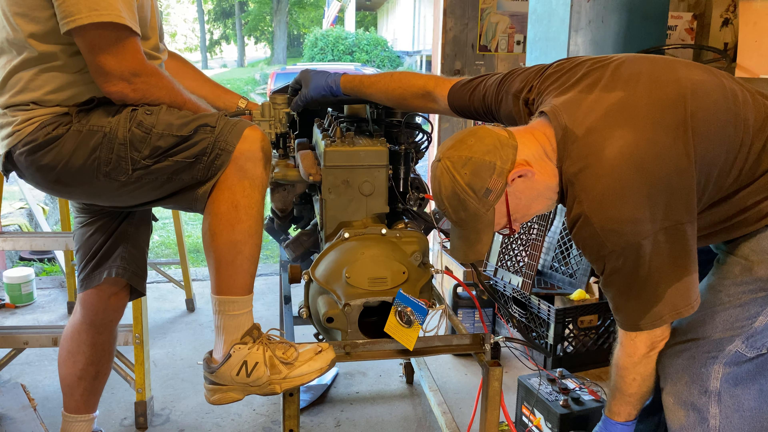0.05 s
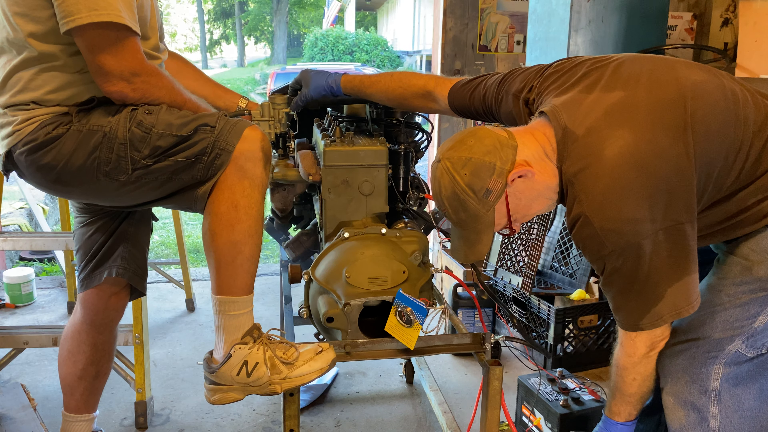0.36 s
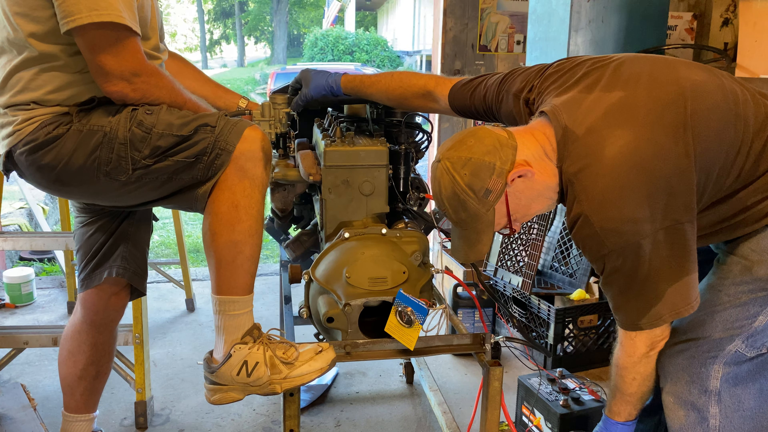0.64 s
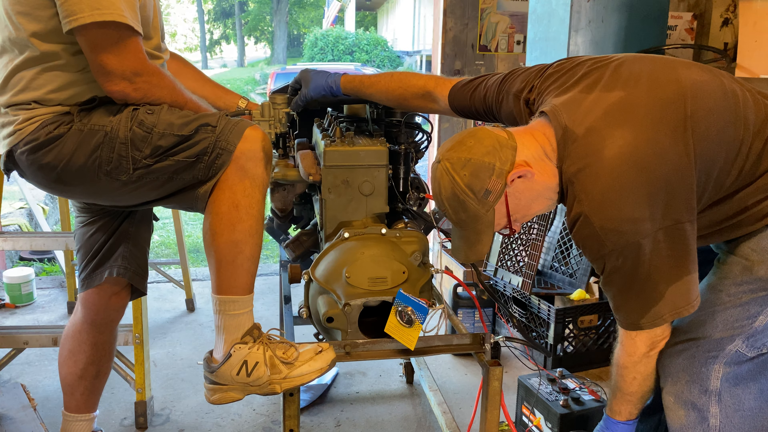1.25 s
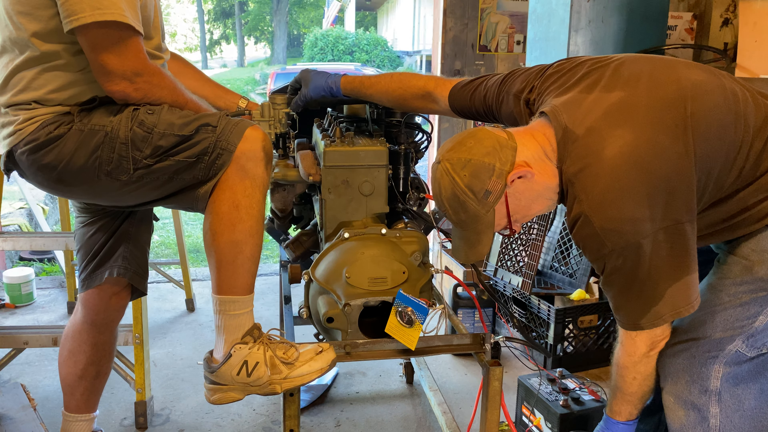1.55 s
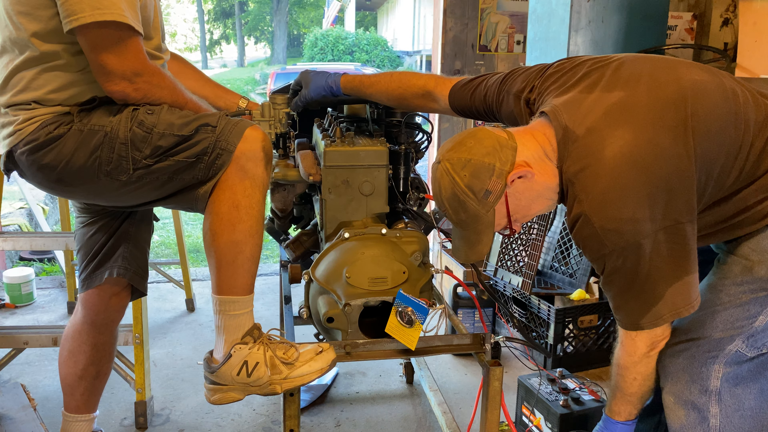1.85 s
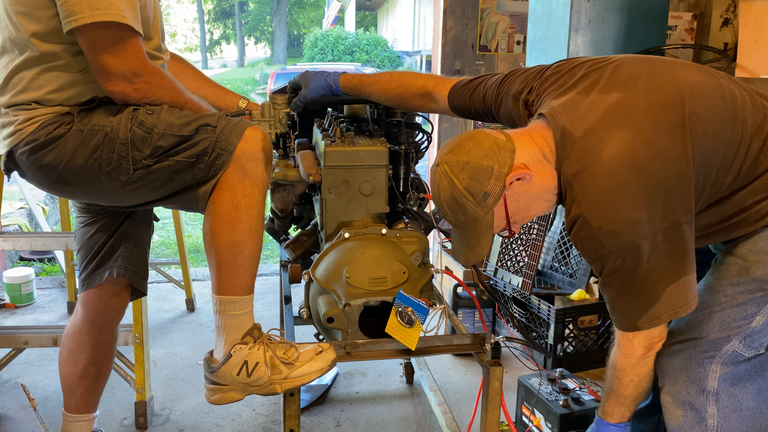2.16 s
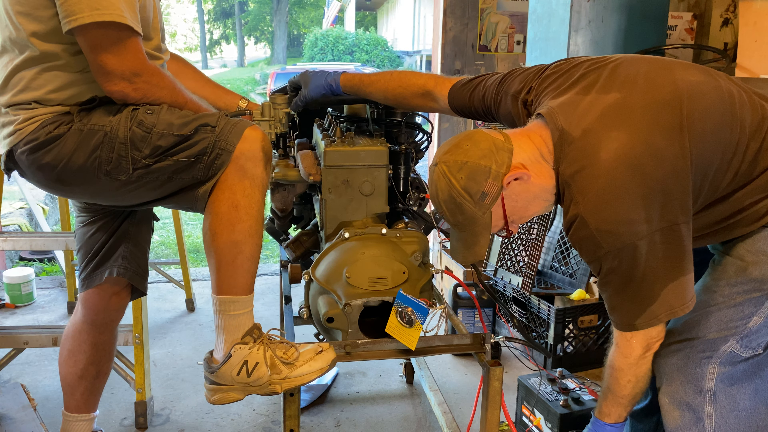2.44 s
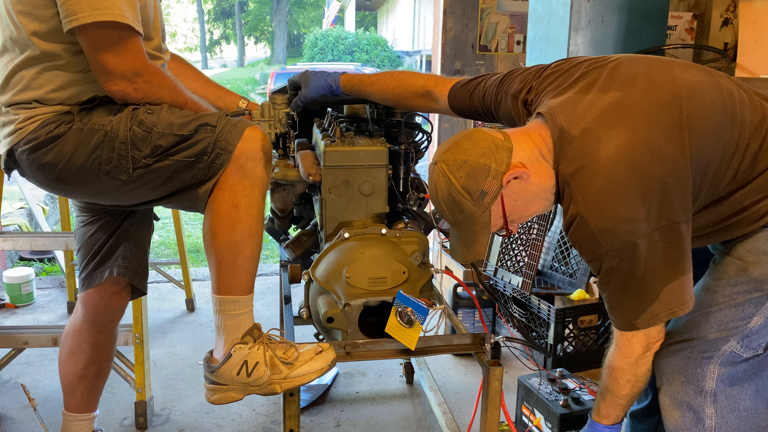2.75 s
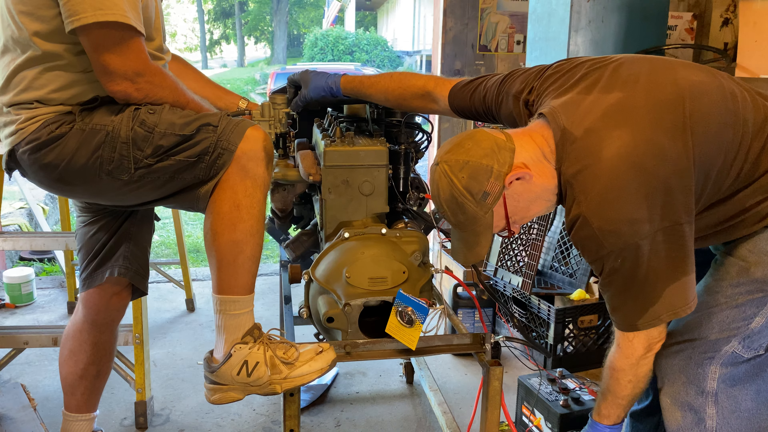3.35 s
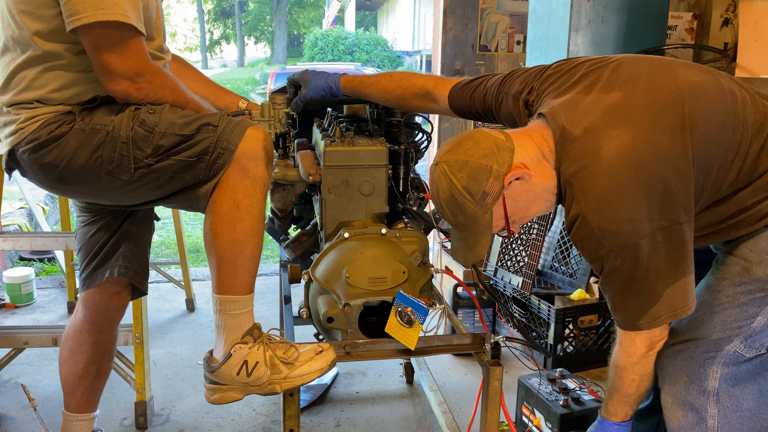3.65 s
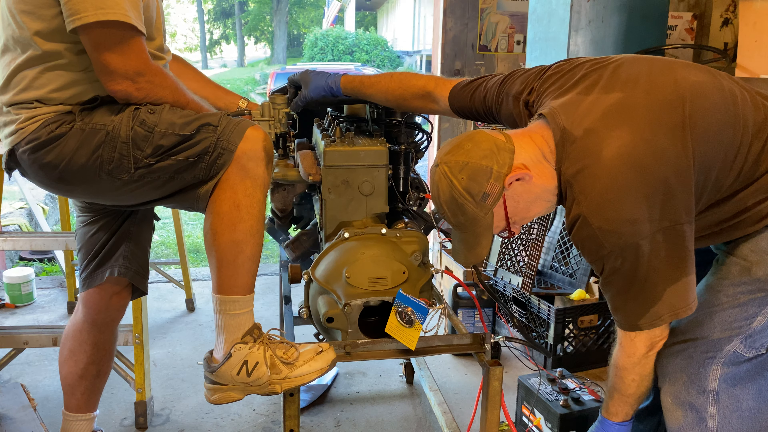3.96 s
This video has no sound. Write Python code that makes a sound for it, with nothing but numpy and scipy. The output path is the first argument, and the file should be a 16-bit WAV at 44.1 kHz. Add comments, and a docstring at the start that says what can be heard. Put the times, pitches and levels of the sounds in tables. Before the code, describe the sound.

An old engine fires in rapid, rattling pulses with low exhaust thumps, then dies. After a short pause the starter clashes in, grinding and squealing, and the engine catches unevenly, heard close in a workshop.

```python
"""Over faint air and hum, an old engine on a workshop stand fires in short runs with misses between.
Each firing: a rattling gas blast that rings the manifold, then a low exhaust thump; the room rings briefly.
It dies after 1.4 s; a faint metal click follows. At 2.4 s the starter clashes in, grinds and squeals.
From 2.6 s the engine catches again and stumbles on over the grinding."""
import sys
import numpy as np
from scipy import signal
from scipy.fft import rfft, irfft
from scipy.io import wavfile

SR = 44100
rng = np.random.default_rng(int(sys.argv[2]) if len(sys.argv) > 2 else 0)


def wrap_up_sound(samples):
    """Save the sound to the file named by the first command line argument, as 16-bit audio."""
    columns = np.atleast_2d(samples).T
    # keep every value between -1 and 1, then stretch to whole-number steps
    tamed = np.clip(columns, -1, 1)
    steps = np.round(tamed * 32767).astype(np.int16)
    wavfile.write(sys.argv[1], SR, steps)


N = 176400

# air noise: freq_hz, gain_db
AIR_SPECTRUM = [(18, -34.5), (30, -11), (113, -4), (132, -23.5), (167, -12), (448, -19.5), (597, -8.5),
                (662, -14.5), (1060, -11), (15000, -50)]
# hum partials: pitch_hz, level_db
HUM_PARTIALS = [(54, -65), (107, -64), (162, -65.5), (268, -75)]

# engine firings, levels before trim: start_s, body_db, rush_db, hiss_db, thump_delay_s, thump_db,
# bark_hz, bark_db, clank_hz, clank_db
ENGINE_FIRINGS = [(-0.004, -23, -24, -42, 0.019, -23, 1819, -51.5, 4280, -49),
                  (0.1046, -23, -21, -30, 0.029, -21.5, 2088, -29.5, 4209, -34.5),
                  (0.167, -23.5, -22.5, -28.5, 0.024, -21, 1464, -49.5, 4950, -27),
                  (0.233, -23, -21, -25.5, 0.0238, -20, 2013, -32.5, 3384, -31),
                  (0.306, -26.5, -20, -26.5, 0.024, -23.5, 1722, -39, 5030, -35.5),
                  (0.3652, -21, -18, -27.5, 0.0235, -20.5, 1378, -38, 4510, -37),
                  (0.419, -20, -16.5, -28, 0.0241, -20.5, 2077, -44, 3480, -32),
                  (0.475, -23.5, -19.5, -24, 0.0231, -20, 1711, -26, 4170, -40),
                  (0.625, -26, -20, -29.5, 0.028, -22.5, 1937, -29.5, 3990, -26),
                  (0.692, -22, -19.5, -30.5, 0.026, -20.5, 1528, -37, 4340, -32.5),
                  (0.7625, -20.5, -20, -27, 0.0234, -21, 1528, -44, 3400, -34),
                  (0.8322, -29, -21.5, -25, 0.026, -22, 1496, -32, 4930, -25),
                  (0.889, -21, -19, -26.5, 0.0243, -20, 2013, -38.5, 3460, -35),
                  (0.9429, -22, -20, -27, 0.0226, -18, 1668, -33, 3170, -25.5),
                  (0.9928, -20, -20.5, -26.5, 0.0232, -18.5, 1711, -50, 4200, -35.5),
                  (1.1213, -24, -21.5, -26, 0.0243, -22.5, 2013, -31.5, 4180, -36),
                  (1.1804, -19.5, -20.5, -33.5, 0.0239, -18, 1679, -43, 4300, -34),
                  (1.2411, -21.5, -16.5, -28.5, 0.023, -19.5, 2056, -25.5, 4140, -33),
                  (1.304, -23.5, -24, -26.5, 0.0248, -19, 2056, -54, 4010, -41),
                  (1.361, -19.5, -19, -27.5, 0.025, -20.5, 1388, -50.5, 5140, -23.5),
                  (1.414, -22, -21.5, -28.5, 0.026, -19.5, 1668, -39.5, 5700, -31.5),
                  (2.583, -29, -36.5, -35, 0.032, -24.5, 1658, -31.5, 4909, -35),
                  (2.6802, -19.5, -19, -32, 0.024, -20, 1442, -45, 4200, -29.5),
                  (2.9785, -20, -18.5, -30, 0.0265, -24.5, 1647, -41.5, 4350, -28),
                  (3.055, -26.5, -20.5, -28, 0.0228, -18.5, 1528, -26, 5780, -28),
                  (3.129, -16, -18, -26, 0.0244, -18, 2228, -30.5, 3430, -24.5),
                  (3.195, -21.5, -21, -26.5, 0.0235, -18, 1356, -36, 2890, -30),
                  (3.2528, -16, -18, -32, 0.0253, -17.5, 1442, -32, 4250, -59),
                  (3.307, -17.5, -16.5, -30.5, 0.0242, -16.5, 1518, -37.5, 4600, -27.5),
                  (3.529, -19, -17, -26.5, 0.0235, -22, 1442, -34, 4220, -29),
                  (3.605, -20.5, -17.5, -27.5, 0.027, -17.5, 1647, -39, 5680, -35),
                  (3.809, -32.5, -23, -29, 0.0312, -24, 1399, -40.5, 4980, -32),
                  (3.974, -39.5, -26, -32, 0.027, -25, 1453, -32, 4600, -30)]
BODY_TRIM_DB, RUSH_TRIM_DB, HISS_TRIM_DB = -2, -1, 3.5
THUMP_TRIM_DB, BARK_TRIM_DB, CLANK_TRIM_DB = 3.5, 5, 4.5
LEAD_S, ATTACK_S, HOLD_S = 0.0064, 0.012, 0.0035  # blast opens LEAD_S before start_s
BODY_DECAY_S, RUSH_DECAY_S, HISS_DECAY_S, BARK_DECAY_S = 0.018, 0.012, 0.015, 0.0089
KNOCK_DB, KNOCK_DECAY_S = -3.5, 0.0036  # sharp edge of the explosion
SCATTER_DB, SCATTER_DECAY_S = -5.5, 0.0035  # close reflections, new per firing
# low, middle and high bands of the blast: freq_hz, gain_db
BODY_SPECTRUM = [(100, 4), (170, 2.5), (245, -5.5), (340, 2), (430, -2), (550, 5.5), (750, -3), (900, 1),
                 (1150, -6.5), (1550, 2), (2100, -1), (2500, -10.5), (3200, -12)]
RUSH_SPECTRUM = [(1800, -21.5), (2500, -1.5), (3200, 1.5), (3750, -2), (4300, 1.5), (5100, -0.5),
                 (6000, 1.5), (7000, 1.5), (8000, -14), (10000, -26)]
HISS_SPECTRUM = [(5500, -26.5), (7500, -5), (8700, -7), (10500, 0), (12500, -6), (16000, -6)]
# each microphone port's own noise against the shared part: freq_hz, gain_db
PORT_SPREAD = [(150, -20), (400, -7), (1200, -1), (5000, 0), (8000, -6), (13000, -12)]
# manifold and casting modes: pitch_hz, t60_s, gain_db
CASTING_MODES = [(360, 0.1, -25.5), (484.2, 0.42, -25.5), (558, 0.75, -25.5), (925, .15, -28.5),
                 (1470, .15, -29.5), (1685, .1, -18.5), (2017, 0.18, -25), (3130, 0.13, -42.5),
                 (4235, 0.15, -31), (4365, 0.14, -25.5), (5790, 0.16, -23)]

# wall echoes of the thump: delay_s, gain_db
WALL_ECHOES = [(.0205, -11), (.072, -21)]
# low room modes: pitch_hz, t60_s, gain_db
ROOM_MODES = [(52, 0.26, -6), (102.8, .15, -12.5), (148, 0.63, -14), (187.1, 0.59, -15),
              (292.5, 0.64, -23.5)]

# blows of solenoid, pinion and gears: start_s, level_db, decay_s, tilt_db_per_octave
METAL_BLOWS = [(1.594, -41.5, 0.015, 2), (2.369, -23, 0.022, 9), (2.411, -11.5, 0.013, 1),
               (2.435, -22, 0.025, 0), (3.131, -23.5, 0.06, 2.5), (3.353, -11, 0.0058, 0),
               (3.928, -33, 0.014, 8)]
# blow before tilt: freq_hz, gain_db
BLOW_SPECTRUM = [(120, -35.5), (280, 5), (700, -9.5), (1150, 4), (2000, 0), (3000, -8), (5000, -4),
                 (8000, -17.5), (11000, -17.5), (16000, -24)]
# starter gear mesh: time_s, tooth_rate_hz
TOOTH_RATE_CURVE = [(2.41, 360), (2.5, 287.9), (2.58, 457), (2.66, 400.2), (2.77, 488.8), (2.85, 428.5),
                    (2.95, 369.2), (3.02, 503.4), (3.12, 559.7), (3.33, 480), (3.41, 385), (3.48, 546.8),
                    (3.58, 398.3), (3.7, 490), (3.85, 343.7), (4, 293.5)]
# starter envelope: time_s, level_db
STARTER_LEVELS = [(2.37, -49), (2.41, -27), (2.5, -32), (2.59, -25.5), (2.66, -31.5), (2.76, -25),
                  (2.82, -30), (2.87, -27), (2.96, -30), (3.07, -32.5), (3.12, -22.5), (3.2, -38.5),
                  (3.36, -26.5), (3.46, -27.5), (3.51, -31), (3.68, -28), (3.75, -38), (4, -43)]
# grinding gears: freq_hz, gain_db
GEAR_SPECTRUM = [(120, -11), (250, -8), (450, 0), (700, 1.5), (1100, 2.5), (1650, 0.5), (2200, 1.5),
                 (2900, 2), (3700, -7), (4700, -3), (6300, -6), (8500, -18.5), (11000, -13.5), (16000, -21)]
# gear slips: start_s, length_s, pitch_hz, glide_hz_per_s, level_db
GEAR_SQUEALS = [(2.537, 0.074, 440, 150, -32), (2.824, 0.076, 450, -600, -34.5),
                (3.101, 0.026, 1650, 900, -23.5), (3.328, 0.053, 1662, 609, -30.5),
                (3.43, 0.077, 1128, -700, -30), (3.77, 0.099, 2642, -11, -36.5), (3.971, .04, 500, 0, -30)]

# workshop decay: freq_hz, t60_s
ROOM_DECAY = [(100, 1), (700, 0.21), (1840, 0.47), (4850, 0.39), (12800, 0.2)]
# reflections against direct sound: freq_hz, gain_db
ROOM_REFLECTIONS = [(60, -20), (170, -13), (300, -7), (600, -3), (2000, -3), (5000, -4), (9000, -8),
                    (16000, -11)]
# left port minus right: freq_hz, phase_rad
PORT_PHASE_GAP = [(400, 0), (1500, .3), (3800, 1.8), (6400, 2.6), (8000, 1.2), (10300, .4), (11600, -.4),
                  (13300, -3.14), (15200, -6)]
# left port minus right: freq_hz, gain_db
PORT_BALANCE = [(60, 11.3), (200, -2.5), (380, 2.5), (1290, 3), (2380, -0.3), (4400, 7), (8120, -0.1),
                (15000, 0)]


def undb(db):
    return 10 ** (np.asarray(db) / 20)


def unit_rms(x):
    return x / np.sqrt(np.mean(x ** 2))


def curve_at(points, hz):
    """Read (freq_hz, value) points on a log-frequency axis."""
    freqs_hz, values = np.array(points).T
    return np.interp(np.log(np.maximum(hz, 1)), np.log(freqs_hz), values)


def bins_hz(size=N):
    return np.arange(size // 2 + 1) * SR / size


def colour(x, points):
    """Filter by (freq_hz, gain_db) points; unit RMS out."""
    return unit_rms(irfft(rfft(x) * undb(curve_at(points, bins_hz())), N))


def resonate(x, hz, width_hz):
    """One damped mode; unit RMS out."""
    pole = np.exp((2j * np.pi * hz - np.pi * width_hz) / SR)
    return unit_rms(signal.lfilter([1], [1, -pole], x).imag)


def ring(x, modes):
    """Damped modes driven by x, gains relative to x."""
    return np.std(x) * sum(undb(db) * resonate(x, hz, np.log(1000) / (np.pi * t60_s))
                           for hz, t60_s, db in modes)


def rattle(ticks_per_s=2200, tick_db=-4):
    """Rushing noise with dense metallic ticks, partly different at the two ports."""
    ticks = (rng.random((3, N)) < ticks_per_s / SR) * rng.standard_normal((3, N))
    noise = rng.standard_normal((3, N)) + undb(tick_db) * unit_rms(ticks)
    per_port = irfft(rfft(noise[1:]) * undb(curve_at(PORT_SPREAD, bins_hz())), N)
    flatten = [(hz, -10 * np.log10(1 + undb(db) ** 2)) for hz, db in PORT_SPREAD]
    return colour(noise[0] + per_port, flatten)


def air_and_hum(t, air_db=-55.5):
    """Faint air noise and a steady low hum."""
    air = colour(rng.standard_normal(N) + .7 * rng.standard_normal((2, N)), AIR_SPECTRUM)
    hum = sum(undb(db) * np.sqrt(2) * np.sin(2 * np.pi * (hz * t + rng.random()))
              for hz, db in HUM_PARTIALS)
    return undb(air_db) * air + hum


def blast_envelope(age_s, decay_s):
    rise = np.minimum(age_s / ATTACK_S, 1) ** 1.06
    return rise * np.exp(-np.maximum(age_s - ATTACK_S - HOLD_S, 0) / decay_s)


def blasts(t):
    """Each firing knocks and vents gas with its own bark and clank; the castings ring on."""
    body, rush, hiss = (colour(rattle(), band) for band in (BODY_SPECTRUM, RUSH_SPECTRUM, HISS_SPECTRUM))
    drive, out = rattle(), np.zeros((2, N))
    lag_s = t[:SR // 50]
    fade = np.exp(-lag_s / SCATTER_DECAY_S) * (lag_s > 0)
    for start_s, body_db, rush_db, hiss_db, _, _, bark_hz, bark_db, clank_hz, clank_db in ENGINE_FIRINGS:
        span = (t > start_s - LEAD_S) & (t < start_s + .15)
        age_s = t[span] - start_s + LEAD_S
        knock = undb(KNOCK_DB) * (age_s > LEAD_S) * np.exp(-np.abs(age_s - LEAD_S) / KNOCK_DECAY_S)
        body_gain = undb(body_db + BODY_TRIM_DB) * (blast_envelope(age_s, BODY_DECAY_S) + knock)
        rush_gain = undb(rush_db + RUSH_TRIM_DB) * (blast_envelope(age_s, RUSH_DECAY_S) + knock / 2)
        hiss_gain = undb(hiss_db + HISS_TRIM_DB) * blast_envelope(age_s, HISS_DECAY_S)
        gas = body_gain * body[:, span] + rush_gain * rush[:, span]
        scatter = undb(SCATTER_DB) * rng.standard_normal(len(fade)) * fade / np.linalg.norm(fade)
        gas += signal.fftconvolve(gas, scatter[None], axes=1)[:, :len(age_s)]
        bark = undb(bark_db + BARK_TRIM_DB) * resonate(drive[:, span], bark_hz, width_hz=120)
        clank = undb(clank_db + CLANK_TRIM_DB) * resonate(drive[:, span], clank_hz, width_hz=150)
        out[:, span] += gas + hiss_gain * hiss[:, span]
        out[:, span] += (bark + clank) * blast_envelope(age_s, BARK_DECAY_S)
    return out + ring(out, CASTING_MODES)


def thumps(t, rise_s=0.0025, fall_s=0.0056, band_hz=(57.6, 480)):
    """A pressure pulse leaves the exhaust after each blast; walls return it, the room booms."""
    age_s = t - 1  # template centred at 1 s
    pulse = np.exp(np.minimum(age_s, 0) / rise_s - np.maximum(age_s, 0) / fall_s)
    pulse = signal.sosfilt(signal.butter(2, band_hz, "band", fs=SR, output="sos"), pulse)
    pulse /= pulse.max()
    peak_s = t[pulse.argmax()]
    exhaust = sum(undb(db + THUMP_TRIM_DB) * np.interp(t - start_s - delay_s + peak_s, t, pulse)
                  for start_s, _, _, _, delay_s, db, *_ in ENGINE_FIRINGS)
    echoes = sum(undb(db) * np.interp(t - delay_s, t, exhaust, left=0) for delay_s, db in WALL_ECHOES)
    return exhaust + echoes + ring(exhaust, ROOM_MODES)


def clashes(t):
    """The solenoid snaps; the pinion slams against the flywheel teeth."""
    out, noise = 0, rattle()
    for start_s, db, decay_s, tilt_db_per_octave in METAL_BLOWS:
        tilted = [(hz, gain_db + tilt_db_per_octave * np.log2(hz / 1000)) for hz, gain_db in BLOW_SPECTRUM]
        envelope = (t >= start_s) * np.exp(-np.maximum(t - start_s, 0) / decay_s)
        out += undb(db) * colour(noise, tilted) * envelope
    return out


def starter(t, wobble=.04, scrape_decay_teeth=0.55, whine_db=-9.5, chatter_db=1.5, ring_db=-3):
    """The pinion grinds on the ring gear: a wavering whine, a scrape per tooth; the castings ring."""
    waver = colour(rng.standard_normal(N), [(20, -1.5), (120, -6), (500, -48.5)])
    tooth_hz = np.interp(t, *np.array(TOOTH_RATE_CURVE).T) * (1 + wobble * waver)
    teeth = np.cumsum(tooth_hz) / SR
    whine = sum(np.sin(2 * np.pi * k * teeth + rng.uniform(0, 2 * np.pi)) / k ** 0.36 for k in range(1, 7))
    scrape = rattle() * np.exp(-(teeth % 1) / scrape_decay_teeth)
    gears = unit_rms(colour(scrape, GEAR_SPECTRUM) + undb(whine_db) * colour(whine, GEAR_SPECTRUM))
    chatter = colour(rng.standard_normal(N), [(70, 15), (200, -19), (800, -60)])
    level_db = np.interp(t, *np.array(STARTER_LEVELS).T) + chatter_db * chatter
    grind = gears * undb(level_db) * (t > STARTER_LEVELS[0][0])
    return grind + undb(ring_db) * ring(grind, CASTING_MODES)


def squeals(t, roughness=.03):
    """Slipping gears groan or squeal on short rough notes."""
    waver = colour(rng.standard_normal(N), [(100, -6.5), (400, -18.5), (2000, -60)])
    out = 0
    for start_s, length_s, pitch_hz, glide_hz_per_s, db in GEAR_SQUEALS:
        age_s = np.clip(t - start_s, 0, length_s)
        cycles = np.cumsum((pitch_hz + glide_hz_per_s * age_s) * (1 + roughness * waver)) / SR
        envelope = np.sin(np.pi * age_s / length_s)
        out += undb(db) * np.sqrt(2) * envelope * np.sin(2 * np.pi * cycles)
    return out


def workshop(x, t, build_s=0.02):
    """Direct sound at two microphone ports, plus a room tail decaying band by band."""
    hz, age_s = bins_hz(), t[:SR]
    noise_spectrum, tail = rfft(rng.standard_normal((2, N))), 0
    for band_hz, t60_s in ROOM_DECAY:
        band = curve_at([(freq_hz, float(freq_hz == band_hz)) for freq_hz, _ in ROOM_DECAY], hz)
        fade = np.exp(-np.log(1000) * age_s / t60_s) * np.minimum(age_s / build_s, 1)
        tail += irfft(noise_spectrum * band, N)[:, :SR] * fade / np.linalg.norm(fade)
    sides = np.array([[.5], [-.5]])
    direct = rfft(x) * np.exp(1j * sides * curve_at(PORT_PHASE_GAP, hz))
    reverb = signal.fftconvolve(x, tail, axes=1)[:, :N]
    reflected = undb(curve_at(ROOM_REFLECTIONS, hz)) * rfft(reverb)
    return irfft((direct + reflected) * undb(sides * curve_at(PORT_BALANCE, hz)), N)


def scene():
    t = np.arange(N) / SR
    machine = blasts(t) + starter(t) + squeals(t) + clashes(t)
    return workshop(machine, t) + thumps(t) + air_and_hum(t)


def record(dry, top_hz=15850):
    """The microphone loses the deepest bass, rounds the peaks and cuts the very top."""
    bass_cut_db = curve_at([(20, -26.5), (32, -17), (42, -34.5), (52, -1.5)], bins_hz(2 * N))
    thinned = irfft(rfft(dry, 2 * N) * undb(bass_cut_db))[:, :N]
    lowpass = signal.ellip(10, .2, 80, top_hz, fs=SR, output="sos")
    return signal.sosfilt(lowpass, np.tanh(thinned))


dry = scene()
out = record(dry)
wrap_up_sound(out)
```